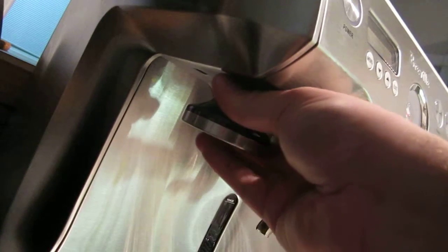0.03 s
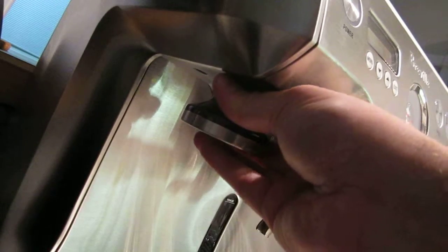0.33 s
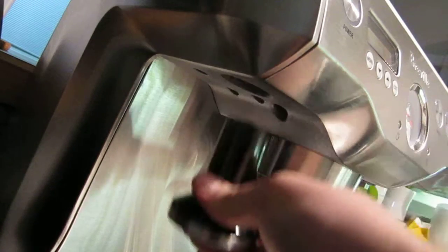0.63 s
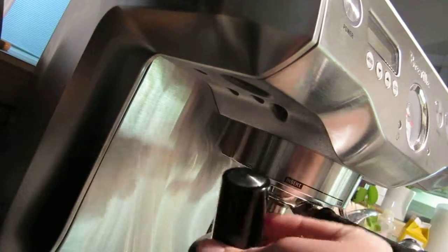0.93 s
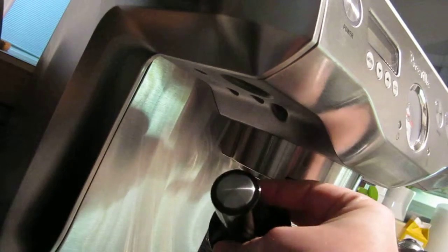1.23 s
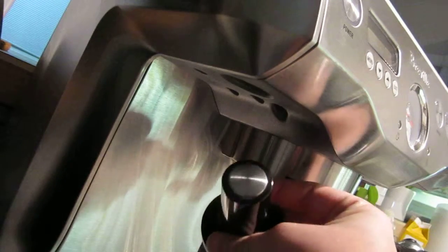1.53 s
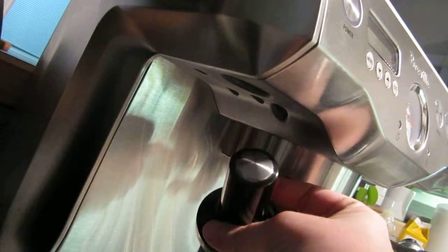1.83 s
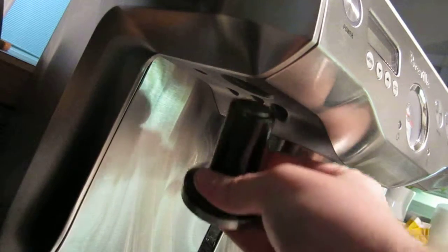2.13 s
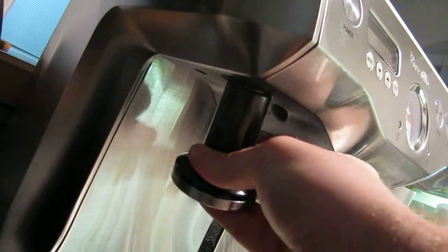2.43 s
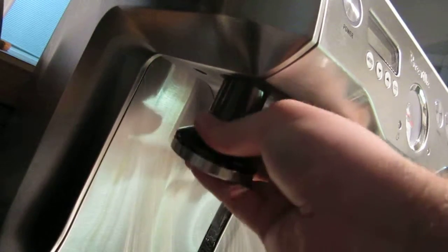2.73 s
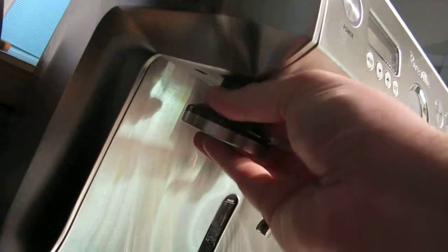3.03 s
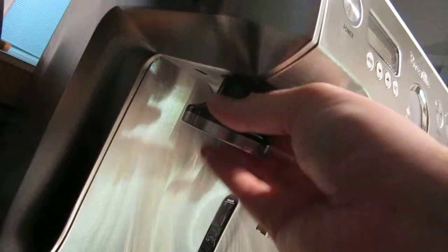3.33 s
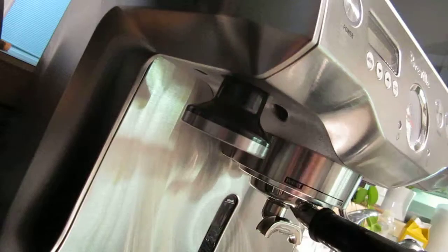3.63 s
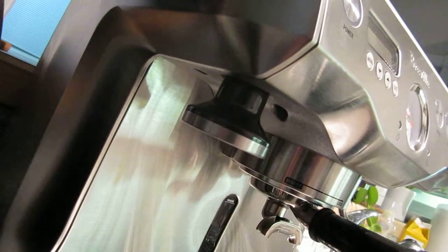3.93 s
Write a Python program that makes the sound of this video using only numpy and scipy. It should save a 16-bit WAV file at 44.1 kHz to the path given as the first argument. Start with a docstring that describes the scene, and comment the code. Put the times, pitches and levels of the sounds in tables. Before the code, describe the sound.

A metal tamper scrapes and clatters out of a coffee machine's socket at about 0.5 seconds, close by. A soft bump follows at 1.3. It knocks against the steel housing at 2.2, rattles and scrapes in the socket from 2.5, then snaps onto the magnet at 3 seconds, the loudest hit, ringing briefly. A faint scrape and tap come near 3.4, over a small kitchen's low hum.

```python
"""Coffee tamper in its magnetic socket

A steel tamper is pulled out of an espresso machine, set down softly, then pushed back. It scrapes
and knocks against the socket, rattles in its mouth and snaps home on the magnet; each blow rings the
steel housing. Behind it lies a small kitchen with a low hum. Gain control ducks after the hardest hits."""
import sys
import numpy as np
from scipy import signal
from scipy.fft import rfft, irfft, next_fast_len
from scipy.io import wavfile

SR = 44100
rng = np.random.default_rng(int(sys.argv[2]) if len(sys.argv) > 2 else 0)


def transcribe(u):
    """Save the signal u as a 16-bit wav file named by the first command-line argument.

    u: samples, shape (n,) or (channels, n), limited to [-1, 1]; the rate is SR.
    q: integer samples, one column per channel.
    """
    v = np.clip(np.atleast_2d(u).T, -1, 1)
    q = np.round(v * 32767).astype(np.int16)
    wavfile.write(sys.argv[1], SR, q)


N = 176400
T = np.arange(N) / SR

# Room tone. Each row: frequency in Hz, relative level in dB.
AIR_COLOUR = [(15, -34.5), (25, -12), (43, -7.5), (117, -8), (212, -10.5), (242, -10.5), (263, -16.5),
              (373, -16), (516, -19), (607, -19.5), (887, -20.5), (1290, -22.5), (1840, -25.5), (7710, -34),
              (16000, -44.5)]
# Appliance hum. Each row: frequency in Hz, RMS level in dB.
HUM_TONES = [(118.6, -61), (240, -66.5)]
# The tamper scrapes in its socket. Each row: start and end in seconds, final gain in dB,
# swell up to it in dB, then the low body and the thin ring in dB relative to that gain.
SCRAPES = [(0.443, 0.468, -39.5, 5.5, 8, -24), (0.457, 0.504, -49, -3, 9.5, -3.5),
           (2.459, 2.515, -62, 0, 17, -13), (2.521, 2.574, -65.5, 2, 26, -10.5),
           (2.787, 2.963, -53.5, 10.5, 13, -23.5), (3.32, 3.399, -45.5, 12.5, -34, -11)]
# Tone of the scrape. Each row: frequency in Hz, gain in dB.
SCRAPE_COLOUR = [(200, -4), (1000, 0), (2500, -8.5), (4400, 2.5), (6000, 1), (8600, -2.5), (13000, -7),
                 (16000, -15)]
# Resonances of socket, housing and tamper. Each row: frequency in Hz, height in dB, T60 in seconds.
STEEL_MODES = [(177.1, 0.5, .14), (256.5, 4, 0.15), (329.3, 0.5, 0.16), (426, -10.5, 0.14),
               (528.9, 6.5, 0.074), (603, -0.5, 0.02), (774.5, -9.5, .06), (919, -7, 0.049),
               (1060, 2, 0.018), (1074, -9.5, .06), (1168, -6.5, 0.089), (1287, -7, .04),
               (1665, 2.5, 0.025), (1980, -4, .025), (2257, -1, .035), (4000, 6, 0.026),
               (5660, -7.5, 0.018), (10000, 3, 0.02)]
# Tamper meets machine. Each row: start in seconds, then housing thud, panel, socket ring and clack
# in dB, clack frequency in Hz, tick in dB.
HITS = [(0.4547, -3.5, 16.5, 19, -6, 2000, -10.5), (0.4610, 0.5, 26, 16, 2, 2000, -23),
        (0.4677, -0.5, 17, 8, 8.5, 2000, -21), (0.4790, -14, 1.5, 18, -7, 2000, -14),
        (0.5130, -7, 4, 20.5, -0.5, 2000, -10.5), (0.521, 13.5, 13, 31, 25.5, 1650, -3),
        (1.284, 2.5, -7.5, -12, -25, 2000, -45), (2.2350, 25.5, 28.5, 26.5, 14.5, 1700, -4.5),
        (2.2460, 24, 23, 18, -0.5, 1700, -25), (2.6086, 13.5, 23, 31, 11, 2300, -2.5),
        (2.6247, -6.5, 10.5, 31, 6, 2200, -16.5), (2.6357, -3.5, 12, 23, -8.5, 2200, -21.5),
        (2.643, -10.5, 15, 16, -14, 2200, -28), (2.6779, -7, 7, 19.5, -15.5, 2000, -29),
        (2.7114, -12, 8, 8.5, -7.5, 2000, -14.5), (2.7125, -3.5, 13.5, 25.5, -8.5, 2000, -23),
        (2.717, -7, 9, 20.5, -13, 2000, -29), (2.9539, -6, 10.5, 20.5, -1.5, 2400, -39),
        (2.9656, 0.5, 22, 40, 10.5, 2400, 0.5), (2.9748, -4.5, 11, 17, -6.5, 2200, -30.5),
        (2.9774, 31.5, 35.5, 28, 26, 2300, 24.5), (3.391, -0.5, -3, -12, -40, 2000, -13)]
# Dense, quickly damped ring of sheet steel. Each row: frequency in Hz, level in dB, T60 in seconds.
SHEET_DECAY = [(100, -5.5, 0.04), (392, -2, 0.15), (988, -11, 0.061), (2050, -6, 0.05), (4503, 0, .022),
               (7900, -5.5, .014), (9630, -7.5, 0.012), (15000, -1, 0.0093)]
# The hand on the housing. Each row: centre in seconds, RMS level there in dB, half-width in seconds.
HAND_PRESSES = [(0.472, -45, 0.069), (2.749, -50.5, .07)]
# Soft bumps and rubs. Each row: start in seconds, pitch in Hz, peak in dB, attack and T60 in seconds.
SOFT_TOUCHES = [(1.284, 113, -32.5, 0.0065, 0.048), (2.53, 435, -34, .02, 0.074),
                (2.547, 327.3, -25.5, .016, 0.11)]
# Kitchen reverb. Each row: frequency in Hz, level in dB, T60 in seconds.
ROOM_DECAY = [(100, -7, 0.71), (250, -8.5, 0.69), (500, -7, 0.38), (1000, -16, .48), (2010, -14, .48),
              (4370, -13.5, 0.35), (7660, -27.5, .36), (10490, -19, 0.17), (15100, -25, .22)]

MODES_SEND_DB, SHEET_SEND_DB, BUMP_SEND_DB = -6.5, -4, -3   # reverb sends


def from_db(db):
    """Decibels to gain."""
    return 10 ** (np.asarray(db) / 20)


def unit_rms(x):
    """Scale to unit power."""
    return x / np.sqrt(np.mean(x ** 2) + 1e-20)


def decay(t, t60):
    """A fade that loses 60 dB every t60 seconds."""
    return np.exp(-np.log(1000) * t / t60)


def at_hz(table, hz, column=1):
    """Read a table's column on a log-frequency axis."""
    table = np.array(table)
    return np.interp(np.log(np.maximum(hz, 1)), np.log(table[:, 0]), table[:, column])


def colour(x, curve):
    """Minimum-phase EQ through the given (Hz, dB) points."""
    size = 2 * next_fast_len(len(x), real=True)
    hz = np.arange(size // 2 + 1) * SR / size
    cepstrum = irfft(np.log(from_db(at_hz(curve, hz))))
    cepstrum[1:size // 2] *= 2
    cepstrum[size // 2 + 1:] = 0
    return irfft(rfft(x, size) * np.exp(rfft(cepstrum)))[:len(x)]


def add(out, start_s, x):
    """Mix x in at start_s."""
    start = int(start_s * SR)
    out[start:start + len(x)] += x[:N - start]


def noise_tail(table, size, build_s=1e-5):
    """Countless modes dying away: third-octave noise bands, each with its own energy and decay."""
    t, out, edges = T[:size], 0, np.geomspace(40, 18000, 27)
    white, bins = rfft(rng.standard_normal(size)), np.fft.rfftfreq(size, 1 / SR)
    for low, high in zip(edges, edges[1:]):
        hz = np.sqrt(low * high)
        envelope = decay(t, at_hz(table, hz, column=2)) * (1 - np.exp(-t / build_s))
        band = irfft(white * (bins >= low) * (bins < high), size) * envelope
        out += from_db(at_hz(table, hz)) * unit_rms(band) * np.sqrt(2 * (high - low) / SR / size)
    return out


def room_tone(air_db=-54.5):
    """A steady bed of kitchen air and low appliance hum."""
    hum = sum(from_db(db) * np.sqrt(2) * np.sin(2 * np.pi * (hz * T + rng.random()))
              for hz, db in HUM_TONES)
    air = colour(rng.standard_normal(N + SR), AIR_COLOUR)[SR:]
    return hum + from_db(air_db) * unit_rms(air)


def scrapes(slips_per_s=5400, spread_db=2.5, direct_db=1.5, split_hz=1900, edge_s=0.0055):
    """Friction in the socket: dense tiny slips lightly ring the steel as the tamper slides."""
    slips = (rng.random(N) < slips_per_s / SR) * rng.choice([-1, 1], N)
    slips = slips * from_db(spread_db * rng.exponential(1, N))
    ringing = signal.fftconvolve(slips, steel_ring(size=8192, scatter_db=-0.2))[:N]
    rub = unit_rms(colour(slips * from_db(direct_db) + ringing, SCRAPE_COLOUR))
    body = signal.sosfilt(signal.butter(3, split_hz, "low", fs=SR, output="sos"), rub)
    hiss = signal.sosfilt(signal.butter(3, split_hz, "high", fs=SR, output="sos"), rub)
    thin_ring = unit_rms(signal.fftconvolve(slips, tamper_ping())[:N])
    out = np.zeros(N)
    for start, end, db, swell_db, body_db, thin_db in SCRAPES:
        gate = np.clip(np.minimum(T - start, end - T) / edge_s + .5, 0, 1)
        swell = from_db(db + swell_db * np.clip((T - end) / (end - start), -1, 0))
        out += gate * swell * (hiss + from_db(body_db) * body + from_db(thin_db) * thin_ring)
    return out


def steel_ring(size, scatter_db, bloom_cycles=0.41):
    """One blow: each mode takes a random strength, blooms as it spreads over the housing, then dies."""
    t, out = T[:size], 0
    for hz, db, t60 in STEEL_MODES:
        height = from_db(db + scatter_db * rng.standard_normal())
        amplitude = height * 2 * np.log(1000) / (t60 * SR)
        bloom = 1 - np.exp(-hz * t / bloom_cycles)
        out += amplitude * bloom * decay(t, t60) * np.sin(2 * np.pi * hz * t)
    return out


def tamper_ping(hz=6600, t60=0.10):
    """The tamper's own thin ring after a touch."""
    t = T[:SR // 5]
    return decay(t, t60) * np.sin(2 * np.pi * hz * t)


def knocks(thud_hz=273, panel_hz=504, ring_hz=1107, tick_hz=9140, ping_db=-61):
    """Hits ring modes and sheet steel, coloured by where and how hard they land: close sound and send."""
    close, send, size = np.zeros(N), np.zeros(N), SR // 5
    # In the room the sheet's fine ripple averages out to a plain click.
    smooth_sheet = from_db(SHEET_SEND_DB) * signal.unit_impulse(size)
    for start, thud, panel, ring, clack, clack_hz, tick in HITS:
        contact_eq = [(64, thud - 18.5), (thud_hz, thud), (panel_hz, panel), (ring_hz, ring),
                      (clack_hz, clack), (tick_hz, tick), (16000, tick - 21.5)]
        modes = steel_ring(size, scatter_db=2.67)
        sheet = noise_tail(SHEET_DECAY, size)
        ping = from_db((ring + tick) / 2 + ping_db) * tamper_ping()
        add(close, start, colour(modes + sheet, contact_eq) + ping)
        add(send, start, colour(from_db(MODES_SEND_DB) * modes + smooth_sheet, contact_eq))
    return close, send


def hand_rumble(band_hz=(56, 112)):
    """Dull noise swells while the hand presses on the machine."""
    bandpass = signal.butter(2, band_hz, "band", fs=SR, output="sos")
    rumble = unit_rms(signal.sosfilt(bandpass, rng.standard_normal(N)))
    swells = sum(from_db(db) * np.exp(-((T - centre) / width) ** 2) for centre, db, width in HAND_PRESSES)
    return rumble * swells


def bumps():
    """Soft contacts, each swelling and dying on one low note."""
    out, t = np.zeros(N), T[:SR // 2]
    for start, hz, db, attack_s, t60 in SOFT_TOUCHES:
        envelope = np.minimum(t / attack_s, 1) * decay(np.maximum(t - attack_s, 0), t60)
        add(out, start, from_db(db) * envelope * np.sin(2 * np.pi * hz * t))
    return out


def scene():
    """The tamper up close and the kitchen around it, in mono."""
    hits, hit_send = knocks()
    friction, soft = scrapes(), bumps()
    send = hit_send + friction + from_db(BUMP_SEND_DB) * soft
    reverb = signal.fftconvolve(send, noise_tail(ROOM_DECAY, size=32768, build_s=0.016))[:N]
    return (hits + friction + soft + hand_rumble() + reverb + room_tone())[None]


def record(dry, limit_db=-5, attack_s=0.00046, release_s=0.63, cutoff_hz=16200):
    """Gain control clamps peaks fast and recovers slowly; soft clipping and a steep top cut follow."""
    over_db = np.maximum(20 * np.log10(np.abs(dry[0]) + 1e-9) - limit_db, 1e-6)
    # Each overshoot is caught, then let go exponentially.
    held_db = np.exp(np.maximum.accumulate(np.log(over_db) + T / release_s) - T / release_s)
    pole = np.exp(-1 / (attack_s * SR))
    duck_db = signal.lfilter([1 - pole], [1, -pole], held_db)
    top_cut = signal.ellip(10, .2, 80, cutoff_hz, fs=SR, output="sos")
    return signal.sosfilt(top_cut, np.tanh(dry * from_db(-duck_db)))


dry = scene()
out = record(dry)
transcribe(out)
```